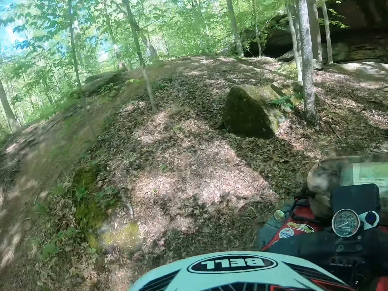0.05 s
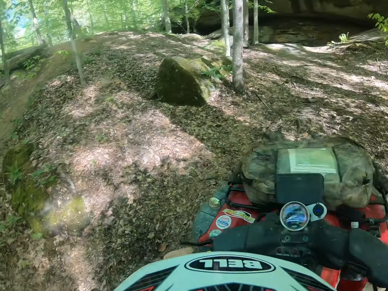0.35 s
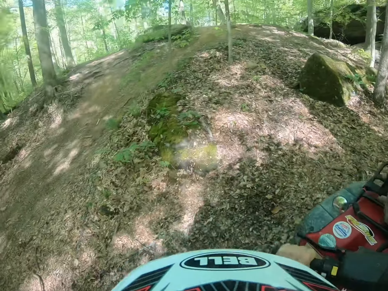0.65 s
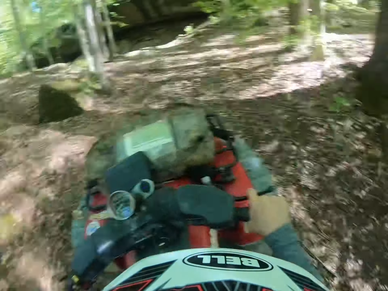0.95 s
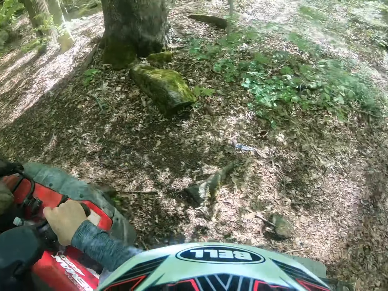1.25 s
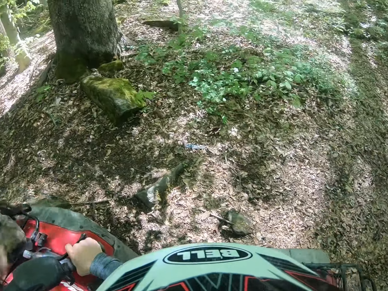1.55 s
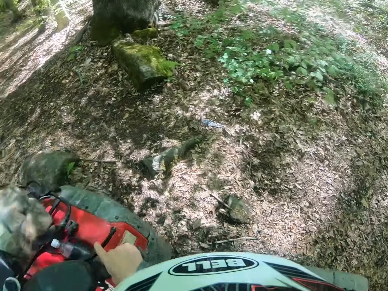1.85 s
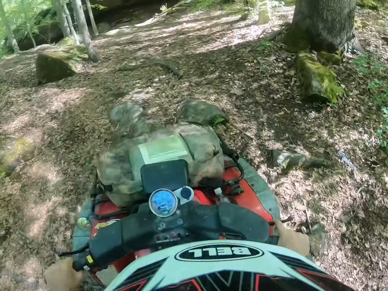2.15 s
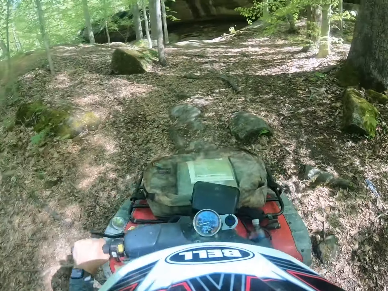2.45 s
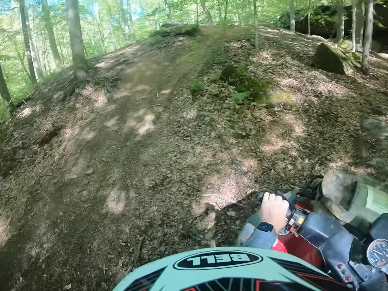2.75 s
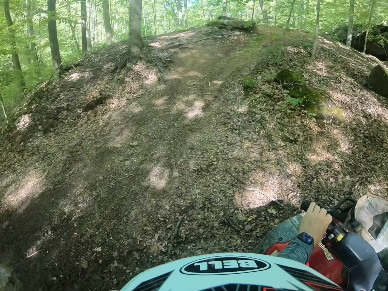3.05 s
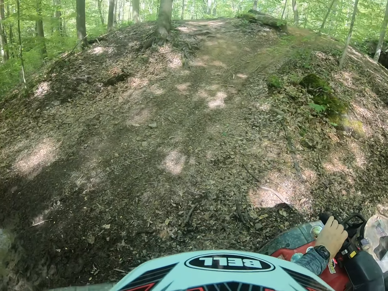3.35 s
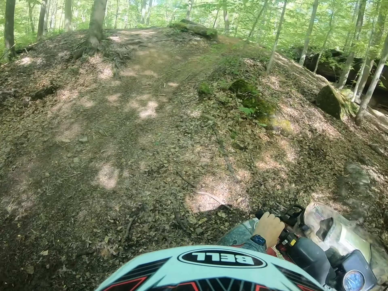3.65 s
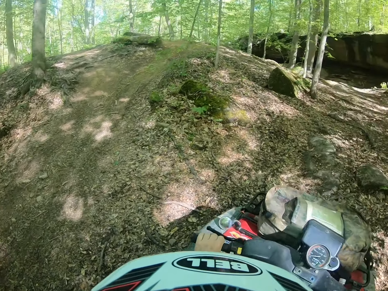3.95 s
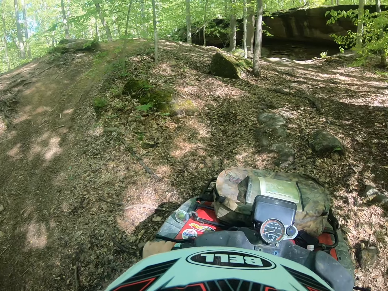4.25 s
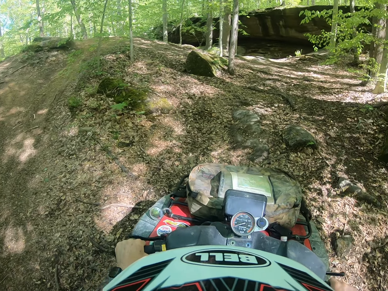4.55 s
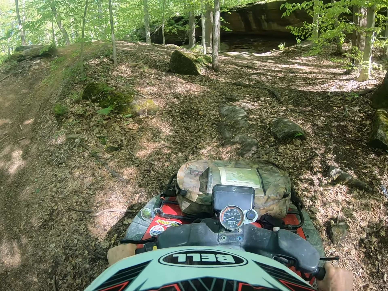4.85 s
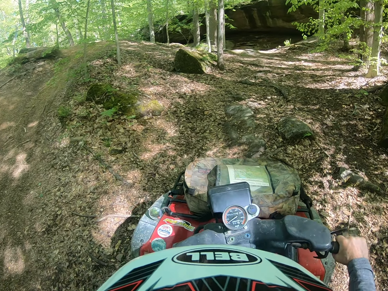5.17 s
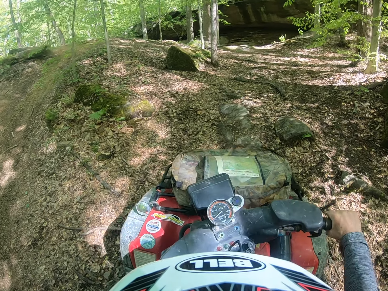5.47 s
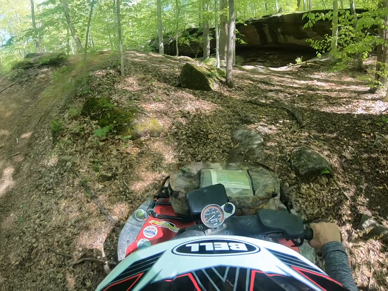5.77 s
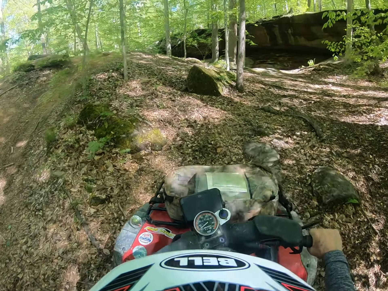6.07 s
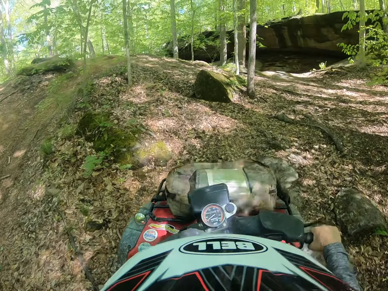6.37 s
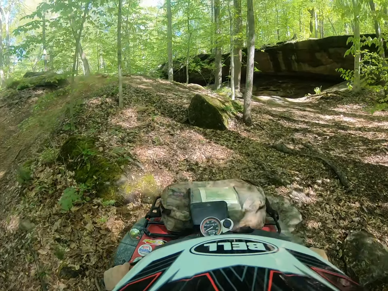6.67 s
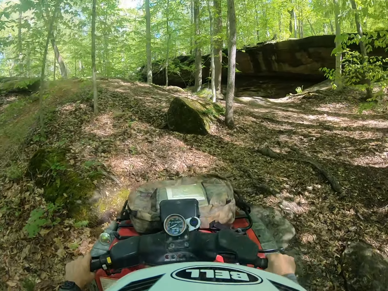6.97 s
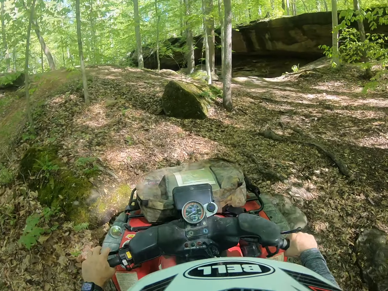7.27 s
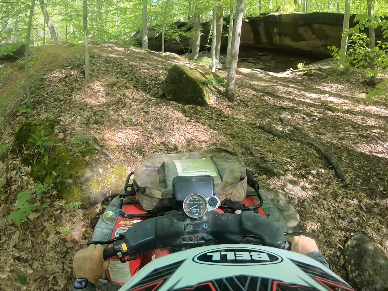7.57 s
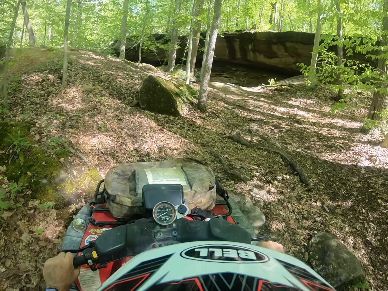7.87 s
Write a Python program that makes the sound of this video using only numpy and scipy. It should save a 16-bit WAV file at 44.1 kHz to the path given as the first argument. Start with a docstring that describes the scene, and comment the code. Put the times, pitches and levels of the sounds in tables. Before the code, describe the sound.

A four-wheeler's single-cylinder engine chugs near idle, thuds and clatters over rocks, then revs harder and eases off.

```python
"""Rough forest ground, with two microphone ports at the helmet of a rider on a crawling four-wheeler.
Just below, the single cylinder chugs near idle, pulls harder for two seconds, then eases off.
Every firing thumps the exhaust and, under load, barks through the engine case; the valves tick.
Rocks jolt the chassis into thuds and plastic clatter; down at the tyres, dry leaves crackle."""
import sys
import numpy as np
from scipy import signal
from scipy.fft import rfft, irfft
from scipy.io import wavfile
from scipy.ndimage import uniform_filter1d

SR = 44100
rng = np.random.default_rng(int(sys.argv[2]) if len(sys.argv) > 2 else 0)


def dump_mix(stems):
    """Bounce the given channels to the path in sys.argv[1] as a 16-bit WAV at rate SR."""
    frames = np.atleast_2d(stems).T  # one column per channel
    limited = np.clip(frames, -1, 1)  # hard clip at full scale
    pcm = np.round(limited * 32767).astype(np.int16)
    wavfile.write(sys.argv[1], SR, pcm)


N = 349272
TIME = np.arange(N) / SR
IDLE_PER_S = 12  # firings
CASE_DB = (-50, 9, 8, -6.5)  # the engine case's arguments to loudness()

# engine speed: (time [s], firing rate [1/s])
FIRING = [(0.0, 10.86), (0.35, 12.16), (1.2, 11.45), (1.65, 10.58), (2.1, 11.54), (2.5, 14.26),
          (2.9, 14.39), (3.6, 14.7), (3.85, 11.66), (4.45, 12.04), (4.85, 15.86), (5.2, 17.7), (5.5, 18.31),
          (5.75, 21.29), (6.0, 21.96), (6.3, 23.13), (6.95, 12.75), (7.92, 12.08)]
# engine load: (time [s], share of the case noise that comes in bursts at the firings [0-1])
LOAD = [(0, 0), (2.2, 0.32), (4.4, 0.62), (4.65, 0.85), (5.7, 0.76), (5.82, 0.27), (6.3, 0.62), (6.5, 0.7),
        (7, 0.49), (7.9, 0.59)]
# the rider's thumb: (time [s], throttle [0-1])
THROTTLE = [(0, 0.05), (.42, 0.23), (.6, 0.63), (2.15, 0.12), (2.6, 0.44), (3.5, 0.23), (3.9, 0.1),
            (4.4, 0.03), (5.1, 0.76), (5.63, 1), (5.85, 0.34), (6.15, 0.56), (6.95, 0.13), (7.9, 0.2)]
# coasting, the wheels driving the engine: (time [s], share [0-1])
OVERRUN = [(6.4, 0), (6.55, 0), (6.8, 0.56), (7.0, 0.4), (7.15, 0)]
# resonances of the engine case: (frequency [Hz], relative level [dB])
CASE_SPECTRUM = [(150, -8), (330, -1), (420, -10.5), (480, -6), (560, -7), (690, -1.5), (770, -2.5),
                 (860, -4.5), (960, -1), (1040, -6), (1170, 5), (1320, -3), (1460, -3.5), (1750, -12.5),
                 (2020, -12), (2450, -28), (3500, -45), (8000, -69.5), (14000, -87.5)]
# blows to the chassis: (time [s], level [dB], hardness [Hz], deepest mode [dB], hollow modes [dB])
JOLTS = [(0.139, -38, 70, 4, -9), (0.527, -16, 220, 4.5, -3), (.594, -17, 336, 6.5, -7),
         (0.696, -14, 173.5, -4.5, -8), (0.783, -14.5, 107.5, -3, -7), (0.904, -22.5, 298, 11, 0.5),
         (0.989, -11, 250, 0, -7), (1.073, -14, 132.4, -7.5, -8.5), (1.125, -26, 289, -10.5, -5.5),
         (1.16, -12.5, 120, -31, -11), (1.286, -24.5, 400, -3, -5), (1.326, -17.5, 128, 0, -1.5),
         (1.5, -27, 260, 3, 1), (1.577, -27, 344, -0.5, -2), (1.689, -37.5, 110.4, 2, -9),
         (1.794, -34.5, 345, -17.5, 1.5), (3.354, -13, 372, -1.5, 2.5), (3.488, -31, 160, 0, 4.5),
         (3.879, -41.5, 147, 12.5, -1), (6.406, -29.5, 108.5, -1, -6), (6.452, -28, 109, -3, -12),
         (7.44, -37.5, 300, -12.5, -5.5), (7.57, -40, 89, 6, -3.5)]


def exhaust(turns, length_s=.15, lag_s=.0013, uneven_db=1.1, detune=.005):
    """Each firing sends one puff down the pipe, whose resonances swell and die."""
    # pipe resonances at 16.5 firings a second: (frequency [Hz], swell time [s], left [dB], right [dB])
    pipe_modes = [(62.4, 0.025, -8, -5.5), (106.7, 0.013, 0.5, -8.5), (160, 0.0023, -9.5, -34),
                  (227.5, 0.006, -21.5, -20), (255.6, 0.013, -23.5, -7), (295.7, 0.009, -10, -8.5),
                  (355, 0.0034, -19, -24.5)]
    # lift of the resonances above 200 Hz: (throttle [0-1], gain [dB])
    rasp = [(0, -5.5), (.1, -6), (.22, 1), (0.399, 0.5), (1, -2)]
    out, t, speed = np.zeros((2, N)), np.arange(int(length_s * SR)) / SR, curve(FIRING)
    hz, swell, left_db, right_db = np.transpose(pipe_modes)[:, :, None]
    upper, deepest = hz > 200, hz == hz.min()
    envelope = (t / swell * np.exp(1 - t / swell)) ** 1.51
    gain = loudness(base_db=-43, doubling_db=5, throttle_db=12, turned_db=.5)
    gain *= np.sqrt(speed.mean() / speed)
    rasp_db = np.interp(curve(THROTTLE), *np.transpose(rasp))
    boom_db = -12 * np.log2(speed / IDLE_PER_S)  # the deepest note booms at idle and fades with speed
    heat = (speed / 16.5) ** .049  # faster, hotter gas raises the resonances
    sag = .15 * np.maximum(curve(LOAD) - .5, 0)  # a long, heavy puff lowers them
    coasting = curve(OVERRUN)
    for at in crossings(turns):
        size, pitch = rng.standard_normal((2, len(pipe_modes), 1))
        limp = coasting[at] * ~upper  # coasting weakens and flattens the low notes
        pipe_hz = hz * heat[at] * (1 + detune * pitch - sag[at] - .11 * limp)
        puff_db = uneven_db * size + upper * rasp_db[at] + deepest * boom_db[at] - 8.5 * limp
        ring = amp(puff_db) * envelope * np.sin(2 * np.pi * pipe_hz * t)
        puff = np.array([(amp(left_db) * ring).sum(0), (amp(right_db) * ring).sum(0)])
        add(out, at / SR + lag_s, gain[at] * puff)
    return out


def engine_case(turns, bark_db=-5.5, gears_db=-2):
    """Combustion barks brightly through the case under load; gears and chain rattle in between."""
    load = curve(LOAD)
    firing = load * bursts(turns, rise_s=.001, decay_s=.009, uneven_db=1.1)
    bark = colour(noise() * np.sqrt(firing), CASE_SPECTRUM, tilt_db=2)
    gears = colour(rattle(per_s=7000, spread_db=.5) * np.sqrt(1 - load), CASE_SPECTRUM)
    return (amp(bark_db) * bark + amp(gears_db) * gears) * loudness(*CASE_DB)


def covers(turns):
    """Under load the piston knocks on the engine covers at each firing."""
    # ring of the covers: (frequency [Hz], level [dB], t60 [s])
    cover_modes = [(688.5, -5.5, 0.11), (812, -12, 0.05), (970, -1.5, 0.1), (1065, -21, 0.08),
                   (1128, -6, 0.063), (1200, -0.5, 0.14), (1396, -15, 0.1), (1543, -6.5, 0.093),
                   (2000, -22, 0.046), (2075, -9, 0.11), (2090, -4.5, 0.07), (2354, -17, 0.058),
                   (2950, -9, .06), (3060, -5, 0.089)]
    force = amp(2) * loudness(*CASE_DB) * curve(LOAD)
    return knocks(turns, cover_modes, force, uneven_db=1.8, scatter=.13, onset_s=.011,
                  tilt_db=-.5, lag_s=.003234)


def drive_slack(turns, place=.69):
    """Slack in the drive closes at one place in every cycle and rings softly."""
    # ring of the closing slack: (frequency [Hz], level [dB], t60 [s])
    slack_modes = [(700, -10.5, 0.068), (776, 7.5, 0.052), (1048, -9, 0.15), (1200, -5.5, 0.081),
                   (1450, -11, 0.12), (1954, -11.5, 0.073)]
    # strength of its blows: (time [s], level [dB])
    slack_level = [(0, -51.5), (1.9, -42.5), (2.15, -48), (2.8, -42.5), (3.8, -41), (4.5, -41.5), (5, -44),
                   (7.9, -42.5)]
    force = amp(curve(slack_level))
    return knocks(turns - place, slack_modes, force, uneven_db=1.3, scatter=.7, onset_s=.012)


def valve_train(turns):
    """Valves open and seat at fixed places in the cycle; they and the firings ring the cylinder head."""
    # valve ticks: (place in the cycle [0-1], relative level [dB])
    timing = [(0.359, 17.5), (.55, 14), (0.659, 10), (0.951, 12)]
    # ring of the cylinder head: (frequency [Hz], relative level [dB])
    head_spectrum = [(1700, -46.5), (2500, -8), (2780, 7), (2900, 5.5), (3010, 3.5), (3130, 9.5), (3270, 1),
                     (3440, -4.5), (3750, -5.5), (3900, -6), (4150, -12.5), (5500, -58), (10000, -77.5)]
    # bright click of the valves: (frequency [Hz], relative level [dB])
    valve_spectrum = [(3000, -33.5), (4300, -15), (5100, -17), (5900, -4.5), (6350, 3.5), (6900, -8),
                      (7600, -17.5), (8200, -25.5), (10500, -29.5), (13500, -57)]
    ticks = sum(amp(db) ** 2 * bursts(turns - place, rise_s=.001, decay_s=.004, uneven_db=2.5)
                for place, db in timing)
    ticks /= ticks.mean()
    bark = curve(LOAD) * bursts(turns, rise_s=.002, decay_s=.011, uneven_db=1.2)
    head = colour(unit_rms(noise() * np.sqrt(.5 + .34 * ticks + .52 * bark)), head_spectrum)
    head *= loudness(base_db=-60, doubling_db=7, throttle_db=2, turned_db=-8)
    valves = colour(noise() * np.sqrt(.37 + .63 * ticks), valve_spectrum)
    valves *= loudness(base_db=-69.5, doubling_db=7.5, throttle_db=6.5, turned_db=-13)
    return head + valves


def pops(decay_s=.009):
    """Single hard firings crack through the case, under load and as the throttle shuts."""
    # hard firings: (time [s], level [dB])
    hard_firings = [(4.887, -37), (5.065, -37), (5.352, -42.5), (5.518, -43.5), (5.571, -32),
                    (5.622, -31.5), (6.4, -39), (6.449, -31.5), (6.549, -41.5), (6.601, -36.5),
                    (6.656, -34), (6.713, -37.5), (6.777, -39), (7.072, -46.5)]
    out, t = np.zeros((2, N)), np.arange(SR // 8) / SR
    for s, db in hard_firings:
        crack = noise(len(t)) * np.exp(-t / decay_s)
        add(out, s, amp(db) * colour(crack, CASE_SPECTRUM, tilt_db=4.5))
    return out


def whirr(turns, throb=.9):
    """The drive resonates while it takes up the pull, swelling with each firing."""
    # two spells of pulling: (time [s], level [dB])
    pull = [(2.25, -75), (2.45, -45.5), (2.85, -51.5), (3.3, -70), (4.9, -71.5), (5.25, -52.5),
            (5.85, -45.5), (6.2, -61), (6.6, -85)]
    # resonances of the drive: (frequency [Hz], relative level [dB])
    spectrum = [(400, -38.5), (620, -23), (720, 5.5), (800, -4.5), (880, -20), (1010, 4.5), (1150, -10),
                (1195, 11.5), (1245, -12.5), (1340, -23), (1470, -8), (1700, -20.5), (2500, -52.5),
                (6000, -61)]
    tugs = 1 - throb + throb * bursts(turns, rise_s=.002, decay_s=.014, uneven_db=1)
    return colour(rattle(per_s=7800, spread_db=0) * np.sqrt(tugs), spectrum) * amp(curve(pull))


def shudder(turns):
    """Under throttle the heavy firings rock the frame in step with the engine."""
    # low engine orders: (multiple of the firing rate, level at full throttle [dB])
    orders = [(2, -50), (3, -61.5)]
    rocking = sum(amp(db) * np.sin(2 * np.pi * order * turns) for order, db in orders)
    return np.array([rocking, np.zeros(N)]) * curve(THROTTLE) ** 2


def fins(turns, t60=.086, top_speed_db=-63, db_per_decade=85):
    """The firings shake the cooling fins into thin ringing, much more at speed."""
    # fin notes: (frequency [Hz], relative level [dB])
    fin_modes = [(2340, -11), (3125, 8.5), (4819, -2), (5378, 3), (7298, -2.5)]
    t, speed = np.arange(SR // 4) / SR, curve(FIRING)
    ring = sum(amp(db - 60 * t / t60) * np.sin(2 * np.pi * hz * t) for hz, db in fin_modes)
    shake = noise() * np.sqrt(bursts(turns, rise_s=.0018, decay_s=.02, uneven_db=1.2))
    ringing = unit_rms(signal.oaconvolve(shake, ring[None], axes=1)[:, :N])
    return ringing * amp(top_speed_db + db_per_decade * np.log10(speed / speed.max()))


def gear_whine(turns, teeth_per_cycle=57, waver=.24):
    """While the wheels drive the engine, the gears sing a faint falling note."""
    flutter = 1 + waver * unit_rms(uniform_filter1d(noise(), size=1500, axis=1))
    return amp(-56) * curve(OVERRUN) * flutter * np.sin(2 * np.pi * teeth_per_cycle * turns)


def jolts(trim_db=-2.5, detune=.025):
    """Wheels hit rocks and roots; harder blows start faster and reach the higher chassis modes."""
    # ring of the chassis: (frequency [Hz], level [dB], t60 [s])
    chassis_modes = [(64, 0.5, 0.5), (97, 6, 0.085), (152, -3, 0.2), (198, -4, 0.15), (250, 3.5, 0.06),
                     (300, -2, 0.09), (400, -10, 0.05)]
    out, t = np.zeros((2, N)), np.arange(SR // 2) / SR
    hz, mode_db, t60 = np.transpose(chassis_modes)[:, :, None]
    deepest, hollow = hz == hz.min(), (hz > 125) & (hz < 225)
    for s, db, hard_hz, deep_db, hollow_db in JOLTS:
        weight = amp(db + mode_db + deep_db * deepest + hollow_db * hollow)
        weight /= np.sqrt(1 + (hz / hard_hz) ** 8)
        pitch = hz * (1 + detune * rng.standard_normal(hz.shape))
        thud = (weight * damped(pitch, t60, t)).sum(0)
        push = 1 - np.exp(-(t * hard_hz / .66) ** 2)
        add(out, s, amp(trim_db) * np.array([thud.imag, thud.real * amp(-2)]) * push)
    return out


def ground_rumble():
    """Rolling over uneven ground sends a deep rumble up to the microphone."""
    # roughness of the ground: (time [s], level [dB])
    roughness = [(0, -41), (.15, -32.5), (.4, -40), (.6, -27), (1.1, -31.5), (1.6, -35.5), (1.85, -49),
                 (2.4, -47), (2.8, -33.5), (3.2, -43.5), (3.4, -34.5), (3.6, -39.5), (4.5, -50),
                 (4.95, -41), (5.2, -44.5), (5.8, -42), (6.2, -57.5), (6.6, -45), (7.05, -53), (7.3, -56),
                 (7.65, -47), (7.9, -64)]
    # the rumble: (frequency [Hz], relative level [dB])
    spectrum = [(8, -11), (20, 9), (36, 1.5), (50, 4.5), (90, -12), (200, -28), (500, -89)]
    return unit_rms(colour(noise(), spectrum, size=32768)) * amp(curve(roughness))


def helmet_sway(rest_db=-55, jolt_db=-14, rise_s=.043, decay_s=.08):
    """Right at the microphone, the helmet sways a little on one low note; each jolt sets it going."""
    # the helmet's low note: (frequency [Hz], relative level [dB])
    spectrum = [(30, -34.5), (48, -27.5), (58, -4), (64, 5), (76, -2), (105, -9), (200, -25), (500, -97)]
    power = amp(rest_db) ** 2
    for s, db, *_ in JOLTS:
        age = np.maximum(TIME - s, 0)
        swing = (1 - np.exp(-(age / rise_s) ** 2)) * np.exp(-age / decay_s)
        power += (amp(db + jolt_db) * swing) ** 2
    return unit_rms(colour(noise(), spectrum, size=32768)) * np.sqrt(power)


def panel_clatter(trim_db=1, onset_s=.0001):
    """Hard bumps throw loose parts and stones against the plastic bodywork around the rider."""
    # hits: (time [s], level [dB], decay [s], tilt [dB/octave])
    hits = [(0.141, -39.5, 0.015, 0.5), (.478, -43, 0.088, -2), (0.533, -39.5, 0.084, -2.5),
            (.594, -33.5, 0.075, -6.5), (.628, -36.5, .02, -5), (0.985, -37.5, 0.1, -0.5),
            (1.006, -39, 0.024, -10), (1.025, -26, 0.012, -1.5), (1.033, -35, 0.0021, -1.5),
            (1.046, -22.5, 0.0086, -1.5), (1.444, -44.5, 0.33, -1.5), (1.592, -38.5, 0.015, 3),
            (1.764, -43.5, 0.15, -0.5), (2.302, -43.5, 0.017, 5), (3.354, -44, 0.031, 3),
            (3.425, -39, 0.046, -0.5), (3.66, -44.5, 0.031, -11), (4.531, -38.5, 0.011, 5)]
    # resonances of the panels: (frequency [Hz], relative level [dB])
    spectrum = [(200, 7.5), (420, 0), (600, -1), (720, 3.5), (830, 3), (1200, 6.5), (1500, -2), (1780, -5),
                (2050, -11), (2500, -10.5), (3050, -5.5), (4500, -40), (6300, -26), (9000, -64),
                (14000, -63)]
    out, t = np.zeros((2, N)), np.arange(SR // 4) / SR
    for s, db, decay_s, tilt_db in hits:
        chatter = noise(len(t)) * np.exp(-t / decay_s) * (1 - np.exp(-t / onset_s))
        add(out, s, amp(db + trim_db) * colour(chatter, spectrum, tilt_db))
    return out


def rack_clunks(onset_s=.0018):
    """The luggage rack knocks in its mounts and rings hollow."""
    # knocks in the mounts: (time [s], level [dB])
    clunks = [(.051, -44), (.218, -43.5), (.295, -45.5), (.413, -44.5), (.438, -46), (.612, -42),
              (1.027, -25.5), (1.048, -25), (1.444, -46), (1.764, -44.5), (2.302, -45.5), (3.662, -40.5)]
    # ring of the rack: (frequency [Hz], level [dB], t60 [s])
    rack_modes = [(725, 7, 0.075), (775, -2, 0.05), (890, 3, 0.035), (985, -2, 0.04), (1190, -2, .06),
                  (1389, -4, .045)]
    out, t = np.zeros((2, N)), np.arange(SR // 4) / SR
    hz, mode_db, t60 = np.transpose(rack_modes)[:, :, None]
    modes = amp(mode_db) * damped(hz, t60, t) * (1 - np.exp(-t / onset_s))
    for s, db in clunks:
        phases = np.exp(2j * np.pi * rng.random((2, len(rack_modes))))
        add(out, s, amp(db) * (phases @ modes).real)
    return out


def spring_squeaks(waver_hz=70):
    """A spring rubs for a moment and sings one thin, unsteady note."""
    # squeaks: (time [s], pitch [Hz], level [dB], length [s])
    squeaks = [(1.052, 6330, -67, .035), (1.325, 1540, -46, 0.038), (1.319, 6100, -65.5, 0.047),
               (3.394, 5400, -60.5, 0.018)]
    out = np.zeros((2, N))
    for s, hz, db, length_s in squeaks:
        size = int(length_s * SR)
        pitch = hz + waver_hz * unit_rms(uniform_filter1d(noise(size), size=60, axis=1))
        note = np.sin(2 * np.pi * np.cumsum(pitch, axis=1) / SR)
        add(out, s, amp(db) * signal.windows.hann(size) * note)
    return out


def leaves():
    """Dry leaves and twigs snap under the tyres, louder with engine speed and throttle."""
    # the crackle: (frequency [Hz], relative level [dB])
    spectrum = [(600, -9.5), (1400, -4), (3200, -1.5), (4600, -23.5), (6400, -34.5), (8500, -36),
                (13500, -75)]
    crackle = colour(rattle(per_s=1000, spread_db=2.8), spectrum)
    return crackle * loudness(base_db=-78, doubling_db=17.5, throttle_db=13, turned_db=5.5)


def grit():
    """Down at ground level the tyres scrub faintly over grit; now and then a stone or twig cracks."""
    # tyre scrub: (time [s], level [dB])
    scrub = [(0, -76), (.5, -74), (1.25, -81.5), (2.3, -76), (2.7, -71), (3.1, -72), (3.4, -72.5),
             (3.7, -76), (4.4, -73), (5.2, -69), (6.4, -69), (6.8, -71.5), (7.9, -74)]
    # stones and twigs: (time [s], level [dB], decay [s])
    cracks = [(0.525, -63.5, 0.061), (1.014, -65, 0.049), (1.032, -44, 0.0011), (3.27, -56, 0.0037),
              (3.36, -66, 0.066), (3.426, -61.5, 0.022)]
    # the crunch: (frequency [Hz], relative level [dB])
    spectrum = [(1000, -4.5), (3500, -4), (5500, 3.5), (7500, 0), (8800, -5), (9600, -8), (13500, -20)]
    crunch = rattle(per_s=9000, spread_db=1) * amp(curve(scrub))
    t = np.arange(SR // 4) / SR
    for s, db, decay_s in cracks:
        add(crunch, s, amp(db) * noise(len(t)) * np.exp(-t / decay_s))
    return colour(crunch, spectrum)


def loudness(base_db, doubling_db, throttle_db, turned_db):
    """A part's gain at the helmet, moved by doublings of idle speed, throttle and the turn of the head."""
    # the rider looks round, away from the engine: (time [s], turn [0-1])
    head_turn = [(0, 0.26), (.5, 0.26), (1.2, 1), (1.55, 0.25), (2.7, 0.41), (3.8, 0.65), (4.5, 0.21),
                 (7.9, 0.11)]
    speed_db = doubling_db * np.log2(curve(FIRING) / IDLE_PER_S)
    return amp(base_db + speed_db + throttle_db * curve(THROTTLE) + turned_db * curve(head_turn))


def microphone_ports(x):
    """Blends two signals into what the helmet's left and right ports pick up."""
    # likeness of the ports: (frequency [Hz], coherence [0-1])
    likeness = [(60, .8), (150, .8), (300, .93), (480, .87), (700, .94), (1200, .985), (2000, .9),
                (3100, .87), (4500, .4), (9000, .2)]
    # their balance: (frequency [Hz], left minus right [dB])
    balance = [(60, -5), (130, -8.5), (280, -11.5), (480, 1), (700, -4), (1200, 0.5), (2000, -3.5),
               (3100, 1), (5000, 2.5), (6400, 6.5), (9000, -0.5), (13000, -1)]
    # delay between them: (frequency [Hz], lead of the left [rad])
    lead = [(60, 0.2), (150, 0.61), (280, 1.35), (500, 2.53), (700, 2.34), (1250, 2.6), (1900, 2.18),
            (2400, 1.82), (3000, 4.14), (3600, 4.6)]
    hz = np.fft.rfftfreq(N, 1 / SR)
    common, separate = rfft(x)
    same, lean = read(likeness, hz), amp(read(balance, hz))
    right = (same * common + np.sqrt(1 - same ** 2) * separate) * np.exp(-1j * read(lead, hz))
    return irfft(np.array([lean * common, right]) * np.sqrt(2 / (1 + lean ** 2)), N)


def knocks(turns, ringing, gain, uneven_db, scatter, onset_s, tilt_db=0, lag_s=0):
    """One blow a cycle rings a set of modes, their levels and phases scattered anew each time."""
    out, t = np.zeros((2, N)), np.arange(SR // 6) / SR
    hz, db, t60 = np.transpose(ringing)[:, :, None]
    modes = amp(db + tilt_db * np.log2(hz / 1000)) * damped(hz, t60, t)
    for at in crossings(turns):
        size, twist = rng.standard_normal((2, 2, len(ringing)))
        weights = amp(uneven_db * size) * np.exp(1j * np.pi * scatter * twist)
        add(out, at / SR + lag_s, gain[at] * (weights @ modes).real * (1 - np.exp(-t / onset_s)))
    return out


def bursts(turns, rise_s, decay_s, uneven_db):
    """Power envelope of one burst per engine cycle, each of its own strength, with mean 1."""
    at, blows, t = crossings(turns), np.zeros(N), np.arange(SR // 8) / SR
    blows[at] = amp(uneven_db * rng.standard_normal(len(at))) ** 2 / curve(FIRING)[at]
    shape = (1 - np.exp(-t / rise_s)) ** 2 * np.exp(-t / decay_s)
    power = abs(signal.oaconvolve(blows, shape)[:N])
    return power / power.mean()


def rattle(per_s, spread_db):
    """Dense tiny impacts of uneven size."""
    size = amp(spread_db * np.minimum(rng.exponential(1, N), 4))
    return unit_rms(noise() * size * (rng.random(N) < per_s / SR))


def colour(x, spectrum, tilt_db=0, size=8192):
    """Causal filter of unit energy: resonances ring after each blow, never before."""
    hz = abs(np.fft.fftfreq(size, 1 / SR))
    octaves = np.log2(np.maximum(hz, 500) / 1000)
    log_gain = np.log(amp(read(spectrum, hz) + tilt_db * octaves))
    minimum_phase = np.exp(np.conj(signal.hilbert(log_gain)))
    ring = np.fft.ifft(minimum_phase).real[:size // 2]
    return signal.oaconvolve(x, ring[None] / np.linalg.norm(ring), axes=1)[:, :x.shape[1]]


def damped(hz, t60, t):
    """Complex ring of a mode that falls 60 dB in t60 seconds."""
    return np.exp((2j * np.pi * hz - np.log(1000) / t60) * t)


def crossings(turns):
    """Samples at which a new engine cycle begins."""
    return np.flatnonzero(np.diff(np.floor(turns)) > 0)


def noise(size=N):
    """Two unrelated white noises."""
    return rng.standard_normal((2, size))


def amp(db):
    """Decibels to gain."""
    return 10 ** (np.asarray(db) / 20)


def unit_rms(x):
    """Scales to rms 1."""
    return x / np.sqrt(np.mean(x ** 2) + 1e-20)


def curve(rows):
    """A time table at every sample."""
    return np.interp(TIME, *np.transpose(rows))


def read(points, hz):
    """A spectrum table on a log-frequency axis."""
    f, value = np.transpose(points)
    return np.interp(np.log(hz + 1), np.log(f), value)


def add(mix, s, sound):
    """Mixes a stereo sound in at time s."""
    part = mix[:, max(round(s * SR), 0):]
    part[:, :sound.shape[1]] += sound[:, :part.shape[1]]


def scene():
    """From the helmet: one count of engine cycles keeps the machine in step; the ground adds its blows."""
    turns = .4 + np.cumsum(curve(FIRING)) / SR
    machine = engine_case(turns) + covers(turns) + drive_slack(turns) + valve_train(turns)
    machine += fins(turns) + pops() + whirr(turns) + gear_whine(turns) + shudder(turns)
    ride = ground_rumble() + helmet_sway() + jolts() + panel_clatter() + rack_clunks()
    ride += spring_squeaks() + leaves() + grit()
    return microphone_ports(machine + ride) + exhaust(turns)


def record(dry):
    """The microphone adds faint hiss and cuts the top of the treble."""
    # microphone hiss: (frequency [Hz], relative level [dB])
    hiss = [(100, -11), (1000, 19), (4000, -2.5), (9000, -14), (12500, -11), (14000, -33.5)]
    heard = dry + amp(-66.5) * colour(noise(), hiss)
    band_limit = signal.firwin(511, cutoff=13900, window=("kaiser", 9), fs=SR)
    return signal.oaconvolve(heard, band_limit[None], "same")


dry = scene()
out = record(dry)
dump_mix(out)
```